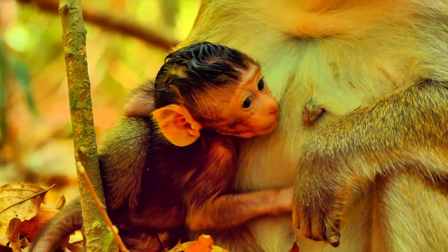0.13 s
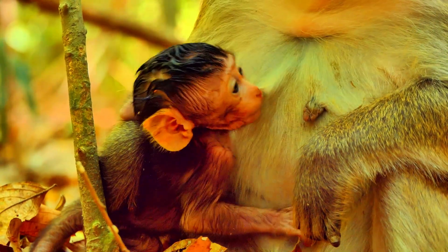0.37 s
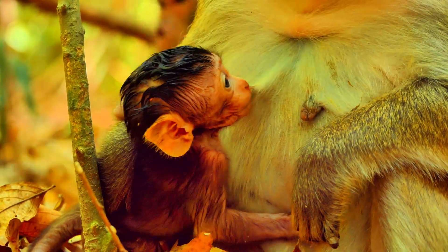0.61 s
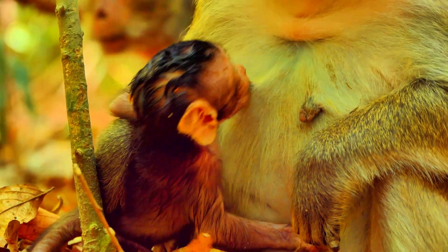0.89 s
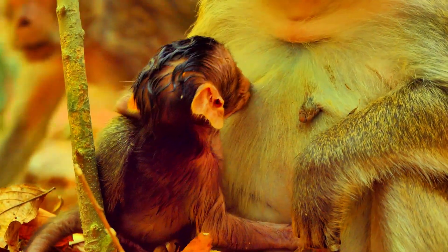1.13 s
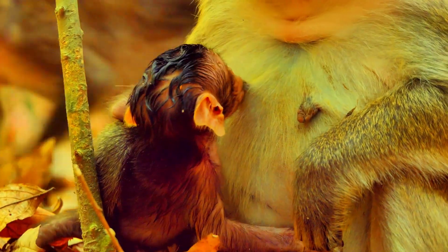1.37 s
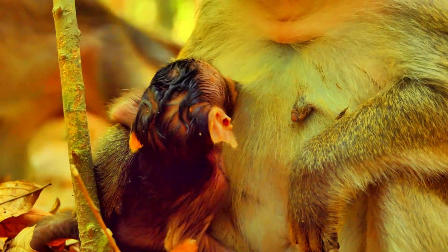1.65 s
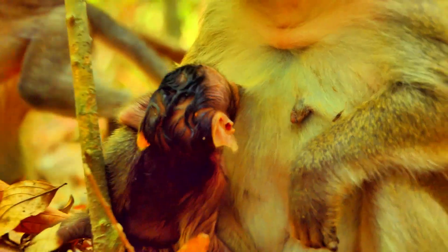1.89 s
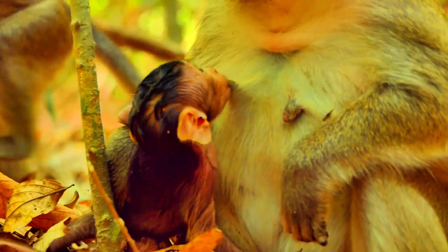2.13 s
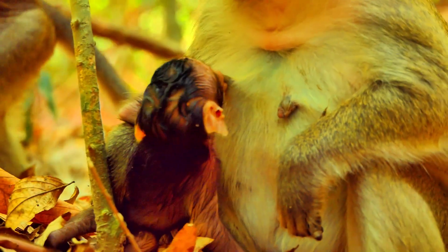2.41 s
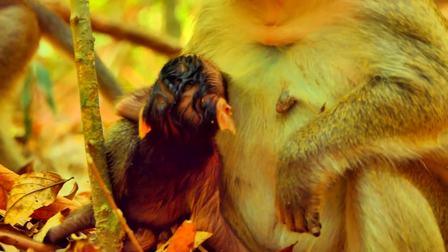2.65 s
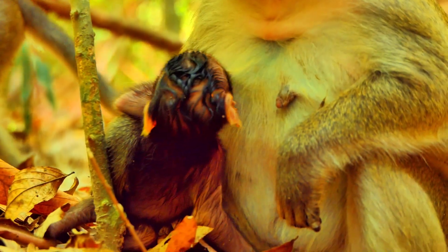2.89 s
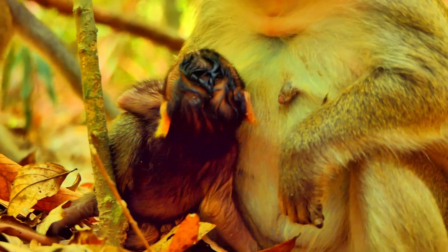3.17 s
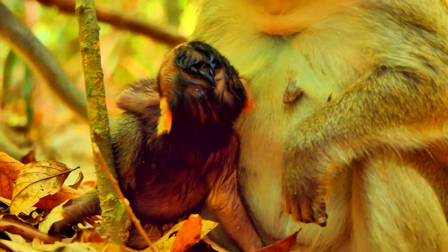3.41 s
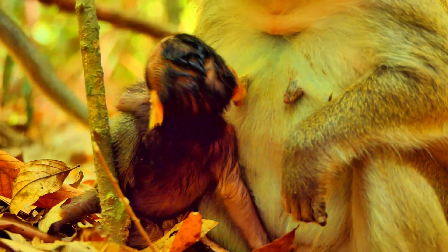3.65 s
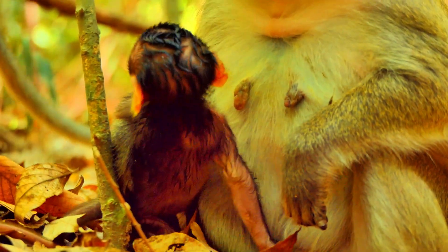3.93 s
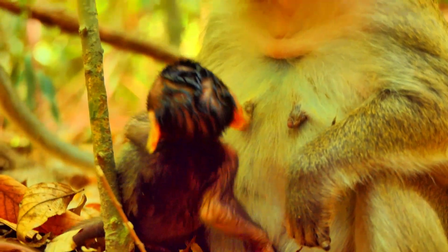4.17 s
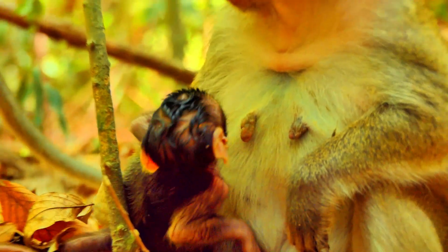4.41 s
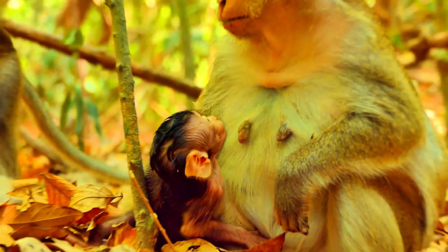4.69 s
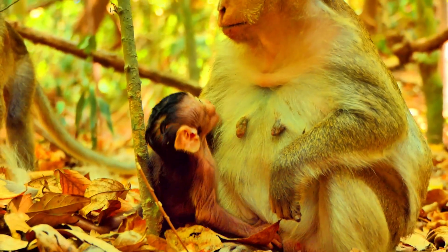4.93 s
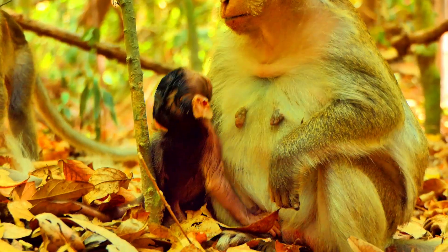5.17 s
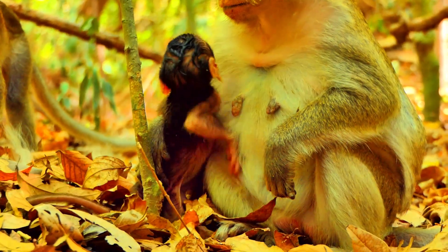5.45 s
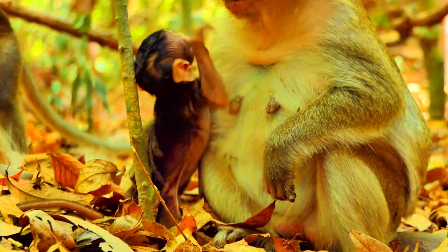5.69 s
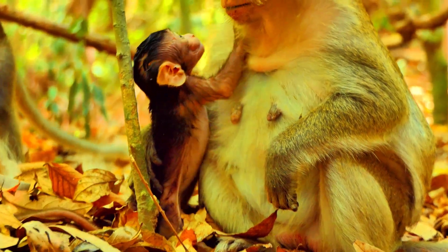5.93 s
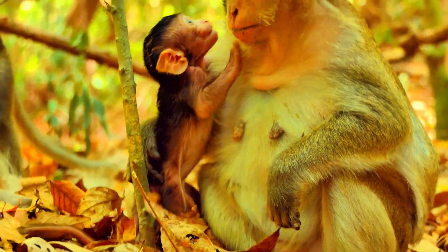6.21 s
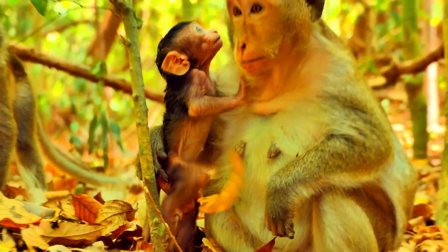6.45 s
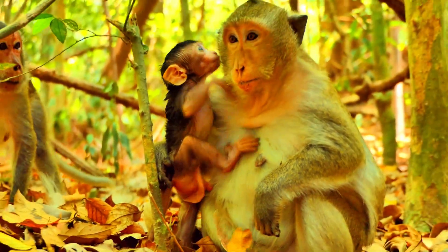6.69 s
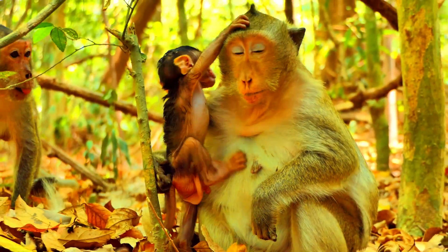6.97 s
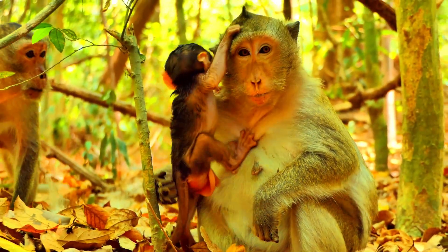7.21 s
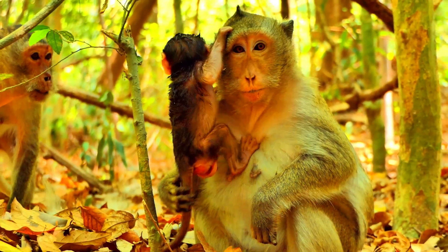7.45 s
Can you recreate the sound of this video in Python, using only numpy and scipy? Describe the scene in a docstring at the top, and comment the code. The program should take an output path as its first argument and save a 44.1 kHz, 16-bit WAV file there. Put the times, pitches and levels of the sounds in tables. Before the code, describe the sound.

A close cicada rings shrilly, throbbing about seven times a second, then accelerates to a rapid double-pulsed flutter as its answering hiss fades. A second, higher, sizzling cicada swells and slides upward, sinks, drops back in pitch and swells again. Steady distant choruses fill the forest. Faint woody knocks cluster early and become busier in the last third. Close stereo microphones outdoors, wide scattered ambience, with very faint low air.

```python
"""Cicadas in a forest

A near cicada throbs faster, then settles; its hiss answers between throbs until each throb splits in two.
Its ring is a cluster of wavering tones; its breath and hiss are random clicks shaped by resonances.
A second cicada, of clicks too, swells, glides up, sinks, drops back in pitch and swells again over choruses.
Low air with a hum and faint hoots is filtered noise. Wooden knocks are dying sine tones, some with a bright
tick of short high tone and noise at the onset, and a late rustle is a spray of grains."""
import sys
import numpy as np
from scipy import signal
from scipy.fft import rfft, irfft, next_fast_len
from scipy.io import wavfile
from scipy.ndimage import uniform_filter1d, map_coordinates

SR = 44100
rng = np.random.default_rng(int(sys.argv[2]) if len(sys.argv) > 2 else 0)


def wav_record(signal):
    """Record a signal, one row per channel, as 16-bit PCM in the file named by sys.argv[1]."""
    frames = np.transpose(np.atleast_2d(signal))
    bounded = np.clip(frames, -1, 1)
    # unit amplitude maps onto the largest positive 16-bit level
    quanta = np.round(bounded * 32767).astype(np.int16)
    wavfile.write(sys.argv[1], SR, quanta)


def field_ratio(decibels):
    """Amplitude ratio for a level in dB (20 dB per decade); scalars and array-likes work."""
    return 10 ** (np.asarray(decibels, dtype=float) / 20)


N = 334719

# the near cicada's abdomen pumping: (time [s], stroke rate [strokes per s])
PUMPING = [(0.0, 7.23), (0.8, 7.91), (1.6, 8.61), (1.85, 13.12), (2.3, 14.11), (2.8, 17.58), (3.4, 18.6),
           (4.0, 19.29), (4.52, 18.89), (4.58, 17.25), (4.9, 18.36), (5.2, 18.07), (5.4, 17.69),
           (5.7, 17.79), (6.2, 17.54), (6.7, 17.73), (7.1, 17.11), (7.59, 17.0)]
# tones beside the near ring: (distance [steps of ring pitch / CYCLES_PER_CLICK], relative level [dB])
SIDE_TONES = [(-0.5, -20), (-1.5, -13), (-0.5, -9.5), (0, -0.5), (1, -13), (1.5, -19), (4.5, -15.5)]
# resonances of the near cicada's breath: (centre [Hz], width [Hz], relative level [dB])
NEAR_BODY = [(3395, 160, -5), (3570, 200, -4), (3800, 120, -1.5), (4085, 160, -7.5)]
# resonances of its hiss: (centre [Hz], width [Hz], relative level [dB])
HISS_BODY = [(6200, 930, -1), (7200, 740, 2), (9500, 1000, -3.5), (11300, 700, -7.5), (12550, 990, -7),
             (14100, 450, -11.5), (15000, 300, -21)]
# the gliding cicada's effort: (time [s], level [dB])
GLIDER_EFFORT = [(0, -46), (1.5, -46.5), (2.05, -41.5), (2.3, -43.5), (2.7, -43), (3.4, -45.5), (4.3, -49),
                 (4.75, -50), (4.95, -53), (5.2, -53.5), (5.8, -44.5), (6.6, -47.5), (7.59, -44.5)]
# its body resonances before tuning: (centre [Hz], width [Hz], relative level [dB])
GLIDER_BODY = [(6326, 80, 2.5), (6680, 61, -6), (7330, 150, 1), (7630, 156, -2.5), (8470, 650, -4),
               (8880, 120, -5), (9720, 460, -10), (10860, 220, -17)]
# colour of the far chorus: (frequency [Hz], relative level per Hz [dB])
CHORUS_COLOUR = [(1500, -60), (2300, -19), (2850, -14.5), (3210, -5), (3800, -1.5), (4310, -10.5),
                 (5000, -7), (5420, -4.5), (5850, -7.5), (6200, -6.5), (7340, -11.5), (7700, -17),
                 (9600, -16), (11400, -21.5), (13300, -33.5), (15400, -45)]
# resonances of a lower-pitched chorus: (centre [Hz], width [Hz], relative level [dB])
LOW_BODY = [(1719, 150, -2), (1818, 413, -5)]
# colour of the forest air: (frequency [Hz], relative level per Hz [dB])
AIR_COLOUR = [(15, -62), (25, -41), (97, -12), (224, -9), (352, -8), (441, -18.5), (535, -15), (840, -12.5),
              (966, -14.5), (1090, -22), (1600, -7), (2080, -30.5), (3520, -120)]
# the air grows a little quieter, divided by 1 + a swell: (middle [s], length [s], swell [dB])
LULL = [(3.1, 1.5, -16.5)]
# faint breathy hoots: (middle [s], length [s], level [dB])
HOOTS = [(.45, .3, -75), (1.5, 0.8, -73.5), (1.98, 0.22, -66), (2.9, 0.4, -71), (3.9, .2, -71),
         (4.68, 0.47, -61.5), (5.4, 0.49, -70), (6.42, 0.28, -60.5), (6.66, 0.11, -61.5), (7.1, 0.28, -69)]
# knocks, levels before mode and bounce gains:
# (time [s], thud pitch [Hz], thud level [dB], middle level [dB], snap level [dB])
KNOCKS = [(0.963, 272, -66, -64, -57), (1.398, 310, -66, -60, -52.5), (1.643, 180, -56, -58, -51.5),
          (1.786, 440, -64, -49, -47), (1.819, 407, -51, -43.5, -51), (1.911, 337, -49, -51, -57.5),
          (2.3, 310, -52, -54, -67), (2.415, 357, -58, -53.5, -62), (2.439, 263, -66, -59, -69),
          (4.454, 254, -45, -50.5, -58), (4.98, 345, -51.5, -52.5, -59.5), (5.099, 350, -47.5, -53, -59),
          (5.257, 325, -61, -54, -64), (5.511, 301, -53.5, -61, -59), (5.529, 263, -64, -48, -63),
          (5.733, 220, -57, -59.5, -61.5), (5.787, 460, -55, -55, -48.5), (5.874, 280, -46.5, -53.5, -59),
          (5.994, 278, -48.5, -57, -56.5), (6.029, 185, -71.5, -57, -64.5), (6.31, 354, -58, -49, -59),
          (6.396, 263, -46.5, -50.5, -69), (6.559, 218, -63, -56, -57), (6.679, 258, -66, -58, -65),
          (6.894, 285, -42.5, -50.5, -52), (7.019, 295, -57, -61, -69), (7.037, 269, -56, -50, -60),
          (7.293, 264, -64, -53, -52)]
# wood modes, one list for the middle and one for the snap:
# (frequency [Hz], relative level [dB], time to fall 60 dB [s])
WOOD = [
    [(582, -3, 0.06), (692, 3, 0.03), (796, 2.5, 0.024)],
    [(1050, 5, 0.019), (1266, -0.5, 0.036)],
]
# bright ticks, nearly all at the onset of a knock:
# (time [s], starting level before filter and side gains [dB], pitch [Hz])
TICKS = [(1.392, -41, 2166), (1.7898, -38, 2250), (1.8223, -33.5, 2360), (4.0223, -40, 2091),
         (5.5296, -38, 2480), (5.7887, -46, 2030), (6.313, -38.5, 2060), (7.2294, -41, 2030),
         (7.2948, -49, 2590)]
# leaves rustling: (middle [s], length [s], level [dB])
RUSTLES = [(7.16, .22, -58)]
# how alike the microphones hear evenly scattered sound: (frequency [Hz], likeness [0 to 1])
ALIKE = [(60, 0.067), (250, 0.3), (1000, 0.62), (2500, 0.71), (3800, 0.92), (6000, 0.91), (9000, 0.89),
         (13000, 0.5)]
# level balance of the microphones: (frequency [Hz], left minus right [dB])
LEAN = [(60, -8), (130, -1.5), (290, -3), (640, -3), (1400, -2.5), (3080, -0.5), (6780, 0.0), (14900, 0.5)]
# timing of the microphones: (frequency [Hz], lead of the left [radians])
LEAD = [(100, 0.084), (780, 0.39), (1800, 0.54), (3500, .01)]

# near cicada: throbs
FIRST_STROKE = -0.2  # part of a stroke done at the start
SPLIT_FROM, SPLIT_DONE = 12, 18  # strokes per s between which each throb splits in two
SQUARE = 1.6  # flattens the top of each throb
WHOLE_DB, LEFT_DB = 5, 0.8  # swell once a stroke, before and after the split
HALVES_DB, DEEPENS_DB_PER_S = 1, 1.07  # swell twice a stroke once split, growing with time
# near cicada: pitch of the ring
CYCLES_PER_CLICK = 28  # ring cycles for each tymbal click; sets how closely the side tones lie
RING_HZ, STARTS_FLAT_HZ, WARM_UP_S, SAG_HZ_PER_S = 3799, 38.02, 0.6, 2.5
WANDER_HZ, HZ_PER_SWELL_DB = 12, 3.5  # slow drift; the ring goes sharp as it swells
# near cicada: base levels
RING_DB, BREATH_DB, TIRES_DB_PER_S = -43.5, -46.5, 0.61
HISS_DB, HISS_HOLDS_S, HISS_FADES_DB_PER_S, HISS_END_DB = -50.5, 2, 3.5, -63
STEP_S, STEP_DB, RECOVER_S = 4.55, -1.3, 0.8  # the level drops at once and creeps back
# gliding cicada: its tuning climbs, then falls back to a fixed ratio
GLIDE_FROM_S, GLIDE_PER_S, GLIDE_ENDS_S, TUNING_AGAIN = 1.64, 0.022, 4.87, 1.003
FAR_DB, LOW_DB, LOW_FADES_DB_PER_S = -40, -51, 0.09
AIR_DB, AIR_WAVERS_DB = -60, 0.06
RUMBLE_DB, RUMBLE_FADES_DB_PER_S, RUMBLE_END_DB = -71, 2.2, -79.5
HUM_HZ, HUM_WIDTH_HZ, HUM_DB, HUM_WAVERS_DB = 965, 42, -69.5, 1.5
HOOT_HZ, HOOT_WIDTH_HZ = 633, 41
MODE_SCATTER_DB = 1.8  # random spread of each knock mode's level


def unit(x):
    """Scale to rms 1."""
    return x / np.sqrt(np.mean(x ** 2) + 1e-20)


def along(points, hz):
    """Read a table of (frequency [Hz], value) on a log frequency axis."""
    f, v = np.transpose(points)
    return np.interp(np.log(hz + 1), np.log(f + 1), v)


def curves(rows):
    """One value per sample for each column after the time."""
    s, *cols = np.transpose(rows)
    return [np.interp(np.arange(N) / SR, s, c) for c in cols]


def filtered(x, response):
    """Filter x by a response of frequency, which may shift phase."""
    m = next_fast_len(N + SR // 4)
    return irfft(rfft(x, m) * response(np.fft.rfftfreq(m, 1 / SR)), m)[..., :N]


def resonances(body, hz):
    """Gain of steep-sided resonances whose powers add."""
    power = 0
    for centre, width, db in body:
        peak = field_ratio(db) / (1 + ((hz - centre) / width) ** 2 * 2)
        power = power + peak ** 2
    return np.sqrt(power)


def clicks(rate):
    """Two unrelated streams of irregular clicks of random size, rate a second on average."""
    return rng.standard_normal((2, N)) * (rng.random((2, N)) < rate / SR)


def shaped(x, gain, patchy_db):
    """Colour x by a gain of (Hz, sample index), with slow random patches, at rms 1."""
    hz, s, z = signal.stft(x, SR, nperseg=2048)
    at = np.clip(s * SR, 0, N - 1).astype(int)
    field = uniform_filter1d(rng.standard_normal(z.shape[1:]), size=8, axis=0)
    field = uniform_filter1d(field, size=6, axis=1)
    z = z * gain(hz[:, None], at) * field_ratio(patchy_db * unit(field))
    return unit(signal.istft(z, SR, nperseg=2048)[1][:, :N])


def wobble(rate):
    """Two smooth random curves through rate random knots a second."""
    knots = rng.standard_normal((2, int(N * rate / SR) + 4))
    at = np.arange(0, N + 32, 32)
    smooth = [map_coordinates(row, [at * rate / SR]) for row in knots]
    return np.array([np.interp(np.arange(N), at, row) for row in smooth])


def swells(rows):
    """Flat-topped swells from rows of (middle [s], length [s], level [dB])."""
    t = np.arange(N) / SR
    return sum(field_ratio(db) * np.exp(-((t - s) / length * 2) ** 4) for s, length, db in rows)


def step_db():
    """A sudden drop in level that wears off."""
    since = np.arange(N) / SR - STEP_S
    return STEP_DB * (since > 0) * np.exp(-np.abs(since) / RECOVER_S)


def firm(phase):
    """A cosine with flattened tops, for the rise and fall of a throb."""
    return np.tanh(SQUARE * np.cos(phase)) / np.tanh(SQUARE)


def near_ring(swell_db):
    """Tones spaced as if regular clicks rang a body; random wobbles blur each one as uneven clicks would."""
    t = np.arange(N) / SR
    ring_hz = RING_HZ - STARTS_FLAT_HZ * np.exp(-t / WARM_UP_S) - SAG_HZ_PER_S * t
    ring_hz = ring_hz + WANDER_HZ * wobble(rate=7)[0] + HZ_PER_SWELL_DB * swell_db
    cycles = 2 * np.pi * np.cumsum(ring_hz) / SR
    tone = 0
    for step, db in SIDE_TONES:
        level = field_ratio(db + 1.1 * wobble(rate=15))
        blur = 2.5 * wobble(rate=6) + 0.35 * wobble(rate=40)
        tone = tone + level * np.cos(cycles * (1 + step / CYCLES_PER_CLICK) + blur)
    return unit(tone)


def near_cicada():
    """Each abdomen stroke swells the ring and breath and hushes the hiss; fast strokes split the swell."""
    t, (rate,) = np.arange(N) / SR, curves(PUMPING)
    turn = 2 * np.pi * (FIRST_STROKE + np.cumsum(rate) / SR)
    split = np.clip((rate - SPLIT_FROM) / (SPLIT_DONE - SPLIT_FROM), 0, 1)
    split = np.maximum.accumulate(split)  # once split, it stays split
    once_db = (WHOLE_DB + split * (LEFT_DB - WHOLE_DB)) * firm(turn)
    twice_db = split * (HALVES_DB + DEEPENS_DB_PER_S * t) * firm(2 * turn)
    swell_db = once_db + twice_db
    ring = field_ratio(RING_DB + swell_db) * near_ring(swell_db)
    breath = shaped(clicks(rate=9000), lambda hz, at: resonances(NEAR_BODY, hz), patchy_db=-0.1)
    song = ring + field_ratio(BREATH_DB + 0.42 * swell_db) * breath
    hiss = shaped(clicks(rate=12000), lambda hz, at: resonances(HISS_BODY, hz), patchy_db=2.0)
    hiss_db = np.clip(HISS_DB - HISS_FADES_DB_PER_S * (t - HISS_HOLDS_S), HISS_END_DB, HISS_DB)
    return field_ratio(step_db() - TIRES_DB_PER_S * t) * song + field_ratio(hiss_db - 0.87 * once_db) * hiss


def gliding_cicada():
    """Random clicks ring a body whose resonances all move up together as the song tightens."""
    t = np.arange(N) / SR
    climbing = 1 + GLIDE_PER_S * np.maximum(t - GLIDE_FROM_S, 0)
    tuning = np.where(t < GLIDE_ENDS_S, climbing, TUNING_AGAIN)
    song = shaped(clicks(rate=20000), lambda hz, at: resonances(GLIDER_BODY, hz / tuning[at]), patchy_db=0.5)
    return field_ratio(curves(GLIDER_EFFORT)[0]) * song


def choruses():
    """Dense random clicks blend like countless far singers into smooth bands, one high and one low."""
    def low_gain(hz, at):
        return resonances(LOW_BODY, hz) / (1 + (1250 / (hz + 1)) ** 8)  # little below 1250 Hz
    far = shaped(clicks(rate=30000), lambda hz, at: field_ratio(along(CHORUS_COLOUR, hz)), patchy_db=0.82)
    low = shaped(clicks(rate=15000), low_gain, patchy_db=0.8)
    low_db = LOW_DB - LOW_FADES_DB_PER_S * np.arange(N) / SR
    return field_ratio(FAR_DB + 0.37 * step_db()) * far + field_ratio(low_db) * low


def air_noise(gain):
    """Steady random noise coloured by a gain."""
    return shaped(rng.standard_normal((2, N)), gain, patchy_db=1.66)


def air_band(centre_hz, width_hz):
    """Noise through a single resonance."""
    return air_noise(lambda hz, at: resonances([(centre_hz, width_hz, 0)], hz))


def air():
    """Filtered noise makes low forest air, a fading rumble, a wavering hum and faint breathy hoots."""
    breeze = air_noise(lambda hz, at: field_ratio(along(AIR_COLOUR, hz)))
    breeze = field_ratio(AIR_DB + AIR_WAVERS_DB * wobble(rate=0.93)[0]) / (1 + swells(LULL)) * breeze
    hum = field_ratio(HUM_DB + HUM_WAVERS_DB * wobble(rate=4)[0]) * air_band(HUM_HZ, HUM_WIDTH_HZ)
    hoots = swells(HOOTS) * air_band(HOOT_HZ, HOOT_WIDTH_HZ)
    rumble_db = np.maximum(RUMBLE_DB - RUMBLE_FADES_DB_PER_S * np.arange(N) / SR, RUMBLE_END_DB)
    return breeze + hum + hoots + field_ratio(rumble_db) * air_band(110, 38)


def knocks():
    """Each blow gives a dull thud and rings the wood's modes at new strengths, then bounces twice, weaker."""
    out, t = np.zeros((2, N + SR)), np.arange(SR // 5) / SR
    for (s, thud_hz, *parts_db), luck in zip(KNOCKS, rng.standard_normal((len(KNOCKS), 9))):
        thud = [(thud_hz, 3, 0.045), (0.695 * thud_hz, -1, 0.05)]
        modes = []
        for part_db, part in zip(parts_db, [thud] + WOOD):
            modes += [(hz, part_db + mode_db, t60) for hz, mode_db, t60 in part]
        ring = 0
        for (hz, db, t60), chance in zip(modes, luck):
            fading_db = db + MODE_SCATTER_DB * chance - 60 * t / t60
            ring = ring + field_ratio(fading_db) * np.sin(2 * np.pi * hz * t)
        ring = ring * (1 - np.exp(-t / 0.0025))  # soft start
        for delay, bounce_db in [(0.001, 10), (0.011, -7), (0.021, -6)]:
            out[0, round((s + delay) * SR):][:len(t)] += field_ratio(bounce_db) * ring
        out[1, round((s + 0.003) * SR):][:len(t)] += field_ratio(4.5) * ring  # echo off the trunks
    # too small to push deep bass
    return filtered(out[:, :N], lambda hz: (1j * hz / (1j * hz + 110)) ** 2)


def ticks():
    """The bright onset of some knocks: a short high tone that dies at once, with a rough spray."""
    out, t = np.zeros((2, N + SR)), np.arange(SR // 20) / SR
    for (s, db, hz), spray in zip(TICKS, rng.standard_normal((len(TICKS), len(t)))):
        tick = field_ratio(db - 60 * t / 0.022) * (np.sin(2 * np.pi * hz * t) + 1.5 * spray)
        out[:, round(s * SR):][:, :len(t)] += tick * field_ratio([[1.5], [-3]])  # direct, scattered [dB]
    return filtered(out[:, :N], lambda hz: resonances([(2200, 1400, 0)], hz))


def rustles():
    """A short spray of dry random grains, brightest in the treble."""
    grains = shaped(clicks(rate=1500), lambda hz, at: resonances([(11000, 4000, 0)], hz), patchy_db=1.1)
    return swells(RUSTLES) * grains


def scene():
    """Add up every source, each with a direct and a scattered part."""
    return near_cicada() + gliding_cicada() + choruses() + air() + knocks() + ticks() + rustles()


def roll_off(x):
    """The treble ends steeply here."""
    return signal.sosfilt(signal.butter(12, 15120, fs=SR, output="sos"), x)


def record(dry):
    """Two close microphones share the direct part and take the scattered part with opposite signs."""
    def share(hz):
        angle = np.arccos(np.clip(along(ALIKE, hz), 0, 1)) / 2
        return np.array([np.cos(angle), np.sin(angle)])

    def tilt(hz):
        left = field_ratio(along(LEAN, hz) / 2) * np.exp(0.5j * along(LEAD, hz))
        return np.array([left, 1 / left])

    mid, side = filtered(dry, share)
    pair = filtered(np.array([mid + side, mid - side]), tilt)
    return roll_off(pair)


dry = scene()
out = record(dry)
wav_record(out)
```